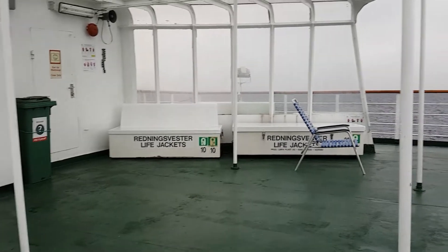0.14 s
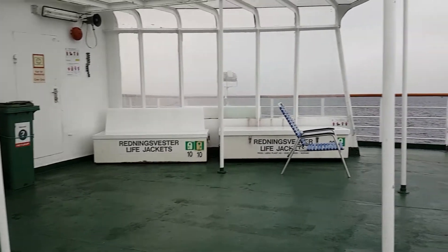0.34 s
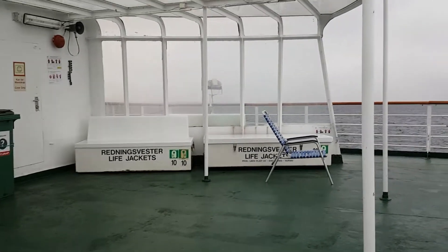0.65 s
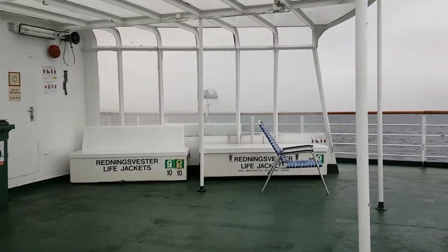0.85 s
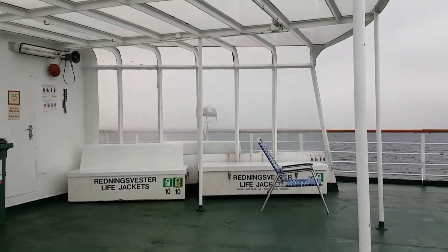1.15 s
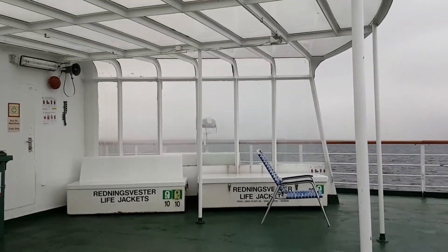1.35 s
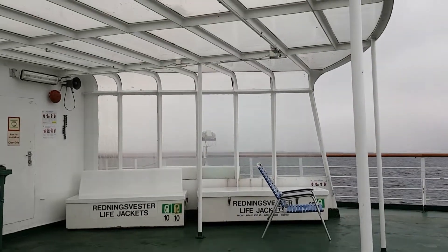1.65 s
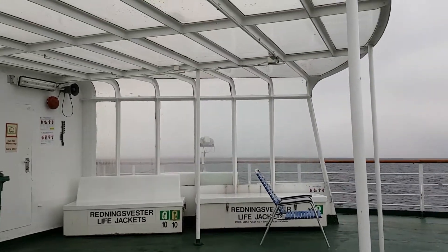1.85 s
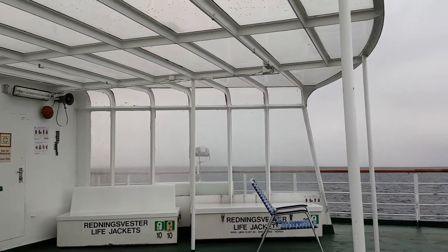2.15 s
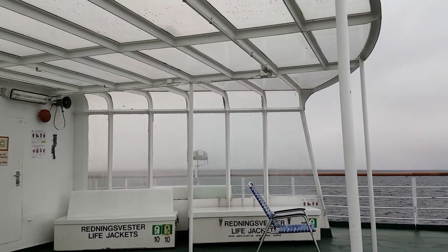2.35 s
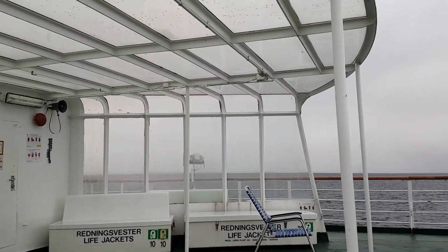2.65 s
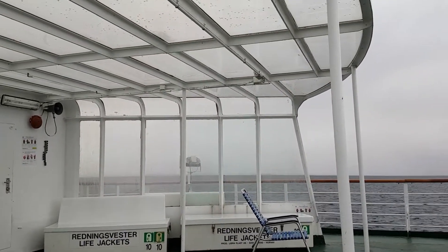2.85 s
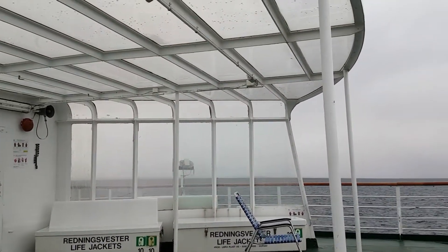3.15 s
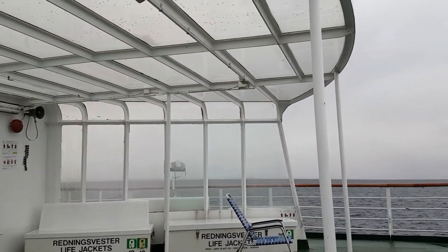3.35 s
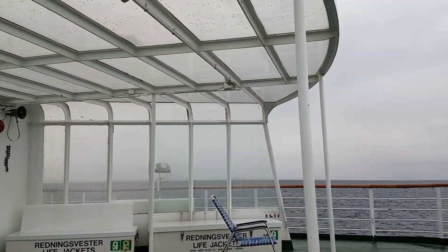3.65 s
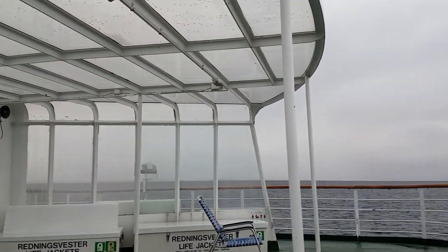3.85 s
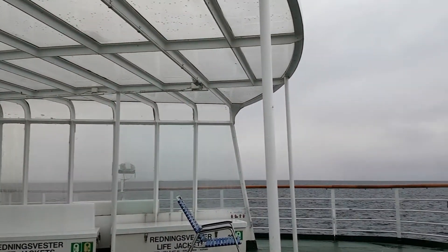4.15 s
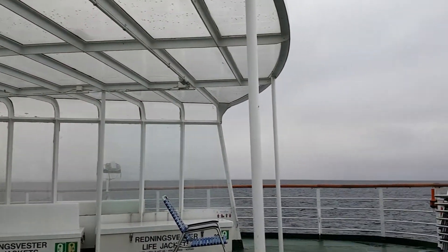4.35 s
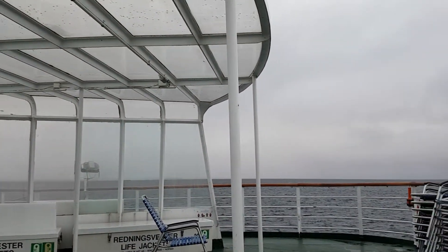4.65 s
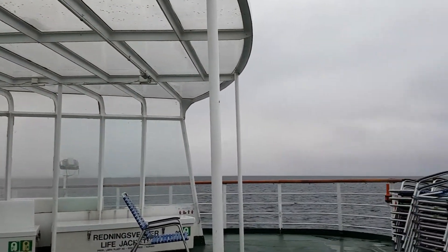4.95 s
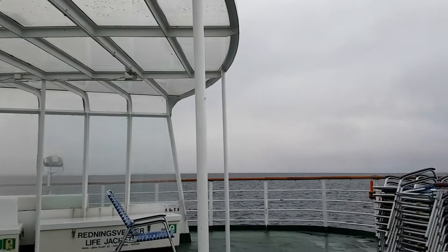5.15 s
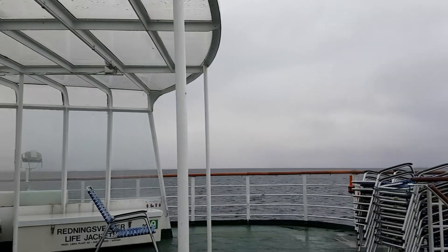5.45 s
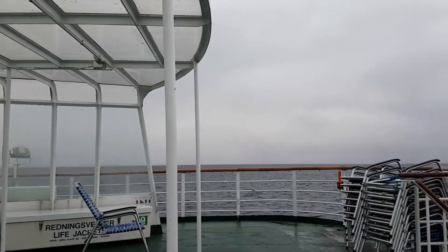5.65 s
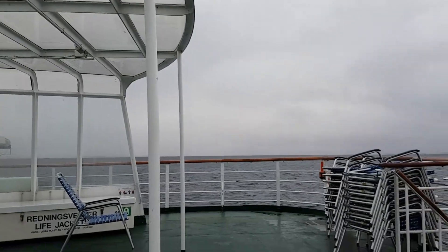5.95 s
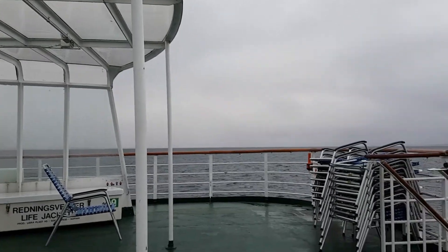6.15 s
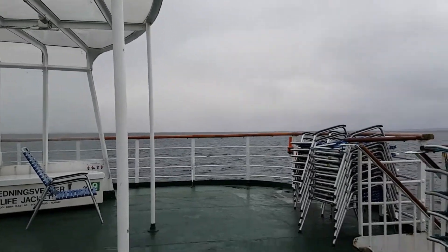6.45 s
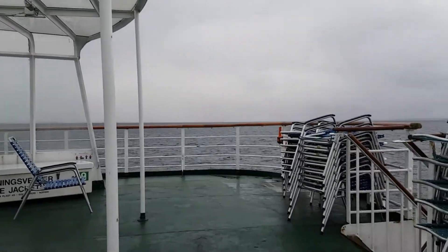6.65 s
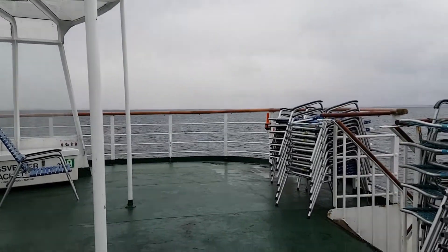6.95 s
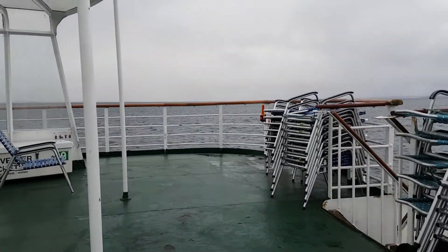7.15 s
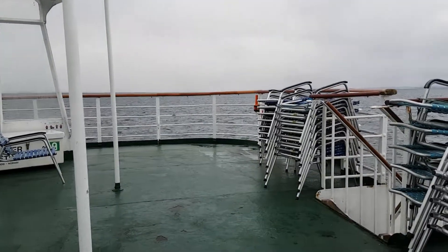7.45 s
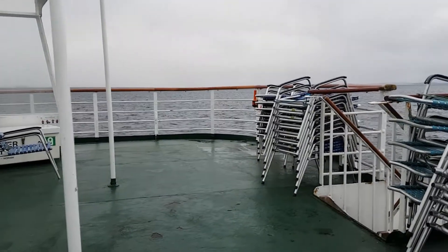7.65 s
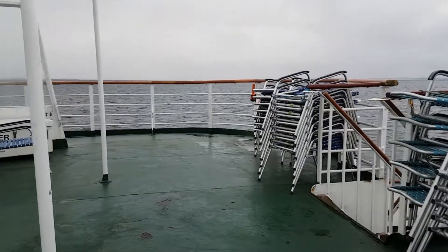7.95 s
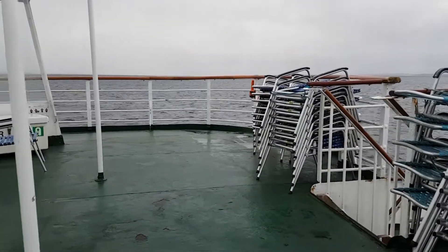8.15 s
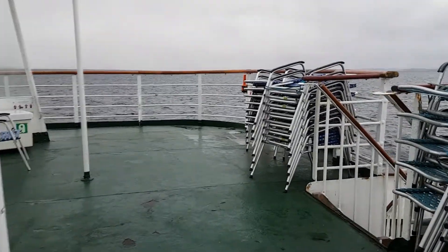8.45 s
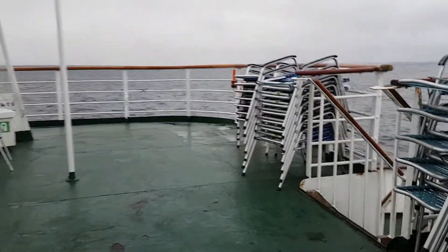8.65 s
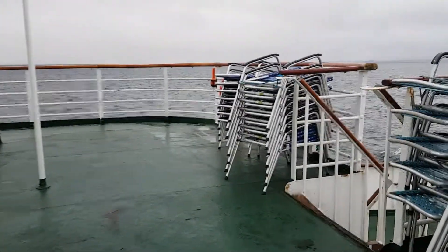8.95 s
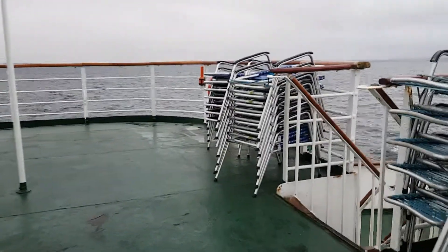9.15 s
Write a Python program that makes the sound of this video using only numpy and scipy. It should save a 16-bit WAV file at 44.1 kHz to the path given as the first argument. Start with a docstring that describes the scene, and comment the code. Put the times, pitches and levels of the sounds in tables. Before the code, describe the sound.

A big ship's diesel throbs and drones steadily over soft rushing air and low wind, with faint shoe ticks, one dull deck thump and a tiny squeak.

```python
"""Open after deck of a ship under way. Throughout, a big four-stroke diesel throbs through the funnel, its
uneven cylinders repeating about three times a second, over exhaust rumble, wake, ventilation and wind.
From 1.8 s a shoe ticks on the wet deck; from 3.2 to 6.4 s the listener turns from the roofed corner to the
open deck and the growl weakens; at 4.8 s the deck plates thump; at 8.4 s the sole squeaks and scrapes, and
at 9.3 s it scrapes again. Engine and hums are sums of sines; air, ticks, scrapes and thump are shaped noise."""
import sys
import numpy as np
from scipy import signal
from scipy.fft import rfft, irfft, next_fast_len
from scipy.io import wavfile
from scipy.ndimage import uniform_filter1d, minimum_filter1d

SR = 44100
rng = np.random.default_rng(int(sys.argv[2]) if len(sys.argv) > 2 else 0)


def file_out(sig):
    """Save sig as 16-bit WAV at sys.argv[1]."""
    # one column per channel
    cols = np.atleast_2d(sig).T
    # limit, then scale
    lim = np.clip(cols, -1, 1)
    pcm = np.round(lim * 32767).astype(np.int16)
    wavfile.write(sys.argv[1], SR, pcm)


N = 410130


def amp(db):
    """Decibels to gain."""
    return 10 ** (np.asarray(db) / 20)


def unit(x):
    """Scaled to rms 1."""
    return x / np.sqrt(np.mean(x ** 2) + 1e-20)


def seconds():
    """Time of every sample."""
    return np.arange(N) / SR


def along(points, hz):
    """(Hz, value) points read on a log frequency axis."""
    point_hz, values = np.transpose(points)
    return np.interp(np.log(hz + 1), np.log(point_hz), values)


def curve(rows):
    """(s, value) rows read at every sample."""
    s, values = np.transpose(rows)
    return np.interp(seconds(), s, values)


def wobble(knots_per_s, size=N):
    """Smooth random curve over the whole scene; its knots repeat after 2048."""
    span = N / SR * knots_per_s
    knots = int(span) + 2
    fine = signal.resample_poly(np.resize(rng.standard_normal(2048), knots), up=8, down=1)
    return np.interp(np.linspace(0, span, size), np.arange(len(fine)) * knots / len(fine), fine)


def filtered(x, response):
    """x times a response of frequency."""
    m = next_fast_len(N + SR // 2)
    return irfft(rfft(x, m) * response(np.fft.rfftfreq(m, 1 / SR)), m)[..., :N]


def noise(patchy_db):
    """Two unrelated white noises under shared, drifting time-frequency patches of gain."""
    z = signal.stft(rng.standard_normal((2, N)), nperseg=512)[2]
    field = uniform_filter1d(rng.standard_normal(z.shape[1:]), size=6, axis=0)
    field = uniform_filter1d(field, size=20, axis=1)
    return signal.istft(z * amp(patchy_db * unit(field)), nperseg=512)[1][:, :N]


def diffuse(spectrum, patchy_db, spacing_ms=0.54):
    """Noise from all sides, rms 1: two microphones agree only on waves longer than their spacing."""
    def mid_side_gains(hz):
        angle = np.arccos(np.sinc(2 * hz * spacing_ms / 1000)) / 2
        return amp(along(spectrum, hz)) * [np.cos(angle), np.sin(angle)]

    mid, side = filtered(noise(patchy_db), mid_side_gains)
    return unit(np.array([mid + side, mid - side]))


TURN_MIDDLE_S, TURN_LENGTH_S = 4.8, 3.2
GROWL_ROOF_DB, GROWL_OPEN_DB = 1.2, -1.24


def turned(before, after):
    """Value moving evenly from before to after while the listener turns."""
    share = np.clip((seconds() - TURN_MIDDLE_S) / TURN_LENGTH_S + .5, 0, 1)
    return before + (after - before) * share


# left-microphone lead at lead_share 1
FULL_LEAD_ROOF_MS, FULL_LEAD_OPEN_MS = 0.38, .29


def from_funnel(x, lead_share):
    """Sound from the left reaches the left microphone first."""
    n = np.arange(N)
    lead_samples = lead_share * turned(FULL_LEAD_ROOF_MS, FULL_LEAD_OPEN_MS) * SR / 1000
    return np.array([np.interp(n + lead_samples / 2, n, x), np.interp(n - lead_samples / 2, n, x)])


CYCLE_HZ = 3.2772
# Strong engine orders. Each row: multiple of the working cycle, nominal rms level in dB.
STRONG_ORDERS = [(7, -39), (8, -33.5), (11, -43.5), (14, -33), (15, -42), (17, -28.5), (18, -30),
                 (19, -27.5), (20, -26.5), (21, -33), (23, -32), (24, -24.5), (25, -34.5), (26, -33.5),
                 (27, -29.5), (28, -33), (41, -32.5), (42, -28), (43, -42.5), (44, -31), (45, -29.5),
                 (46, -31.5), (48, -28), (49, -34), (50, -38.5), (53, -40), (60, -38.5), (61, -30.5),
                 (63, -34.5), (66, -37.5)]
# Weak orders between them. Each row: frequency in Hz, nominal rms level of each order in dB.
WEAK_ORDER_LEVELS = [(20, -53), (40, -40), (110, -45), (160, -49), (210, -48.5), (255, -42.5), (305, -50.5),
                     (360, -57.5), (420, -67)]
# Slow level of the exhaust's lowest orders. Each row: time in seconds, gain in dB.
LOW_BEAT = [(0, 1.5), (2.3, 1), (3.2, -1.5), (4.4, 0), (6.4, -.3), (7.4, 2.5), (8.1, -1.5), (9.3, -3.5)]


def engine(flutter=.17, flutter_rise_hz=260, chuff_db=3, drone_swell_db=.3):
    """Orders of the working cycle sound as sines; varying firings shake the high ones most."""
    step = 30  # orders are summed at SR / step
    t = np.arange(N // step + 1) * step / SR
    strong = {round(k): db for k, db in STRONG_ORDERS}
    bands = np.zeros((3, len(t)))
    for k in range(6, 130):
        hz = k * CYCLE_HZ
        level = amp(strong.get(k, along(WEAK_ORDER_LEVELS, hz)))
        drift = wobble(1.482, size=len(t)) + 1j * wobble(1.509, size=len(t))
        shake = flutter * drift * (.5 + hz / flutter_rise_hz)
        carrier = np.exp(2j * np.pi * (hz * t + rng.random()))
        line = unit(np.real((1 + shake) * carrier))
        bands[np.searchsorted([115, 190], hz)] += level * line  # band edges in Hz
    # one loud cylinder makes the top orders chuff once a cycle
    bands[2] *= unit(amp(chuff_db * np.cos(2 * np.pi * CYCLE_HZ * t)))
    low, middle, top = signal.resample_poly(bands, step, 1, axis=1)[:, :N]
    exhaust = low * amp(curve(LOW_BEAT))
    exhaust += middle * amp(drone_swell_db * wobble(1.5))
    exhaust += top * amp(turned(GROWL_ROOF_DB, GROWL_OPEN_DB))
    return from_funnel(exhaust, lead_share=0.68) * amp([[.3], [-.3]])


# Resonances of funnel and deck. Each row: frequency in Hz, relative density in dB per Hz.
RUMBLE_SPECTRUM = [(22, -29.5), (48, -12.5), (66, -2), (76, 2.5), (108, -5), (143, -6), (178, -10),
                   (200, -9.5), (225, -11), (255, -13.5), (310, -14), (345, -19.5), (410, -22),
                   (600, -38.5)]


def rumble(level_db=-21.5, swell_db=0.83):
    """Turbulent exhaust gas booms in funnel and deck resonances; its growl fades away from the roof."""
    boom = diffuse(RUMBLE_SPECTRUM + [(1500, -90.0), (4000, -130)], patchy_db=2.5)
    growl = filtered(boom, lambda hz: along([(170, 0.037), (210, 0.69)], hz))  # linear gains
    rest = boom - growl
    swell = amp(level_db + swell_db * wobble(2.7))
    return swell * (rest + growl * amp(turned(GROWL_ROOF_DB, GROWL_OPEN_DB)))


def wavering_tones(rows, waver_hz, knots_per_s):
    """Sum of sines whose pitches wander independently; rows of Hz and dB rms."""
    tones = np.zeros(N)
    for hz, db in rows:
        phase = 2 * np.pi * np.cumsum(hz + waver_hz * wobble(knots_per_s)) / SR
        tones += amp(db) * unit(np.sin(phase))
    return tones


# Auxiliary machines, beating against the engine. Each row: mean frequency in Hz, rms level in dB.
HUM_TONES = [(76.18, -25), (97.64, -40.5)]


def hums(waver_hz=.15):
    """Auxiliary machines run at their own nearly steady speeds."""
    return from_funnel(wavering_tones(HUM_TONES, waver_hz, knots_per_s=0.96), lead_share=1)


STEP_RISE_S, STEP_T60_S = .002, .09
# Sole contacts. Each row: start in seconds, relative level in dB.
STEP_TIMES = [(1.8092, -55), (2.0348, -54.5), (2.5469, -44.5), (3.285, -48.5), (4.7602, -48),
              (4.9373, -54.5), (5.116, -50), (7.1226, -56), (7.202, -44.5), (7.428, -52.5), (7.5565, -48),
              (7.595, -52), (7.6121, -48)]
# Tick colour. Each row: frequency in Hz, gain in dB before the high-pass.
TICK_SPECTRUM = [(1500, -22), (4200, 5), (7000, -3.5), (9000, -4), (9900, 7), (10800, -7), (13000, -2),
                 (15500, -2)]


def steps(level_db=-3, grain_db=3):
    """A sole touches or peels off the wet deck: short, bright, gritty noise ticks."""
    out = np.zeros((2, N + SR))
    t = np.arange(SR // 4) / SR
    for s, db in STEP_TIMES:
        grit = amp(grain_db * unit(uniform_filter1d(rng.standard_normal(len(t)), size=60)))
        decay = amp(db + level_db - 60 * t / STEP_T60_S) * np.minimum(t / STEP_RISE_S, 1)
        start = round(s * SR)
        out[:, start:start + len(t)] += decay * grit * rng.standard_normal((2, len(t)))
    return filtered(out[:, :N], lambda hz: amp(along(TICK_SPECTRUM, hz)) * hz ** 2 / (hz ** 2 + 1500 ** 2))


SQUEAK_START_S, SQUEAK_LENGTH_S, SQUEAK_MIDDLE_HZ, SQUEAK_DB = 8.448, .021, 6050, -48


def squeak(overtone_db=-8, rough=.025, fall_octaves=0.35):
    """Rubber sticks and slips on wet paint: whistle and octave drop onto a pitch, hold, drop away."""
    slip = np.clip(2 * (seconds() - SQUEAK_START_S) / SQUEAK_LENGTH_S - 1, -1, 1)
    hz = SQUEAK_MIDDLE_HZ * 2 ** (-fall_octaves * slip ** 3)
    phase = 2 * np.pi * np.cumsum(hz * (1 + rough * wobble(900))) / SR
    whistle = np.sin(phase) + amp(overtone_db) * np.sin(2 * phase)
    return amp(SQUEAK_DB) * np.sqrt(1 - slip ** 2) * whistle


# Sole scrapes. Each row: start in seconds, nominal level in dB, rise in seconds, t60 in seconds.
SCRAPE_STROKES = [(8.449, -50.5, .016, .25), (8.492, -54, .01, .2), (9.278, -44.5, .001, .06)]
# Rasp of the sole. Each row: frequency in Hz, relative density in dB per Hz.
RASP_SPECTRUM = [(2500, -13.5), (4000, 0.5), (5600, -0.5), (7200, -10.5), (10500, -11.5), (11800, -5),
                 (12350, 1), (13000, -10.5), (15500, -12)]


def scrape(judder_db=3):
    """A sliding sole judders: noise rasps that rise and die away."""
    t = seconds()
    strokes = np.zeros(N)
    for s, db, rise_s, t60_s in SCRAPE_STROKES:
        decay = amp(db - 60 * np.maximum(t - s - rise_s, 0) / t60_s)
        strokes += np.clip((t - s) / rise_s, 0, 1) * decay
    return strokes * amp(judder_db * wobble(300)) * diffuse([(800, -50)] + RASP_SPECTRUM, patchy_db=1.0)


def canopy(x, t60_s=.8, dull_hz=4800):
    """Steel walls and the glass roof answer with a short, dulled noise tail."""
    t = np.arange(SR // 2) / SR
    b, a = signal.butter(2, dull_hz, fs=SR)
    tail = signal.lfilter(b, a, rng.standard_normal((2, len(t)))) * amp(-60 * t / t60_s)
    return signal.fftconvolve(x, tail / np.linalg.norm(tail[0]), axes=1)[:, :N]


THUMP_S, THUMP_DB = 4.83, -27


def thump(decay_db_per_s=250, rise_s=.012):
    """A heavy, soft blow booms briefly in the deck plates as low noise."""
    t = np.maximum(seconds() - THUMP_S, 0)
    blow = amp(THUMP_DB - decay_db_per_s * t) * np.minimum(t / rise_s, 1)
    spectrum = [(100, -28.5), (330, 0.5), (480, -7.5), (700, -20), (2000, -61.0)]
    return blow * diffuse(spectrum, patchy_db=1.5)


# Rushing air. Each row: frequency in Hz, relative density in dB per Hz.
RUSH_SPECTRUM = [(150, -18), (330, -11), (450, -1.5), (520, -5), (700, -4.5), (900, -10.5), (1350, -13),
                 (1900, -13), (2350, -17), (2900, -24), (3500, -30.5), (5000, -46), (9000, -83.5)]
# Fine hiss. Each row: frequency in Hz, relative density in dB per Hz.
HISS_SPECTRUM = [(2500, -20), (3700, -2), (4500, 0), (5400, -5.5), (7200, -8), (8500, -6), (9600, -10),
                 (12000, -11), (15500, -13)]
# Strength of the rushing air. Each row: time in seconds, gain in dB.
AIR_LEVEL = [(0, -36), (1.5, -36.5), (2.8, -35.2), (3.4, -36), (3.9, -34.5), (4.7, -37), (9.3, -37.5)]


def rush(around_db=-2, direct_db=-6, hiss_db=-60.5, swell_db=.25, hiss_swell_db=.5):
    """Wake and moving air surround the deck, swelling gently; ventilation blows from the funnel side."""
    around = diffuse(RUSH_SPECTRUM, patchy_db=1.43) * amp([[-.7], [.7]])
    vent_tilt = [(400, -7.0), (700, -5.5), (1350, 0.5), (2000, -8.0)]
    vent = filtered(rng.standard_normal(N), lambda hz: amp(along(RUSH_SPECTRUM, hz) + along(vent_tilt, hz)))
    direct = from_funnel(unit(vent), lead_share=1.0) * amp([[-2], [2]])
    hiss = diffuse([(1000, -40)] + HISS_SPECTRUM, patchy_db=.3) * amp([[-.7], [.7]])
    swell = wobble(2.5)
    air = amp(around_db) * around + amp(direct_db) * direct
    air *= amp(curve(AIR_LEVEL) + swell_db * swell)
    return air + amp(hiss_db + hiss_swell_db * swell) * hiss


# Wind on the microphones. Each row: frequency in Hz, relative density in dB per Hz.
BUFFET_SPECTRUM = [(12, -35.5), (25, -13), (50, 0.5), (100, -3.5), (200, -15), (500, -49.5), (2000, -100)]


def wind(level_db=-35, gust_db=2):
    """Gusts buffet the microphones in soft, low noise, partly different on each port."""
    gusts = amp(gust_db * wobble(0.98))
    return amp(level_db) * unit(gusts * diffuse(BUFFET_SPECTRUM, patchy_db=0.5, spacing_ms=3.7))


# Faint machinery whistles. Each row: mean frequency in Hz, rms level in dB.
WHISTLE_TONES = [(11902, -85), (12106, -88.5), (12284, -85)]


def whistles(waver_hz=8):
    """Thin, unsteady machinery tones high above the drone."""
    return from_funnel(wavering_tones(WHISTLE_TONES, waver_hz, knots_per_s=20), lead_share=0.86)


def scene():
    """Machinery, shoe, thump and air together."""
    slide = (squeak() + scrape()) * amp([[1.5], [-1.5]])
    ticks = steps()
    shoe = slide + ticks + canopy(amp(-5.0) * slide + amp(-6) * ticks)
    machinery = engine() + rumble() + hums() + whistles()
    return machinery + shoe + thump() + rush() + wind()


TOP_HZ = 15800


def record(dry):
    """A limiter holds down the tallest peaks; a band limit then removes everything from TOP_HZ up."""
    ceiling = .62
    needed = ceiling / np.maximum(np.abs(dry).max(axis=0), ceiling)
    gain = uniform_filter1d(minimum_filter1d(needed, size=SR // 50), size=SR // 50)
    return filtered(dry * gain, lambda hz: hz < TOP_HZ)


dry = scene()
out = record(dry)
file_out(out)
```